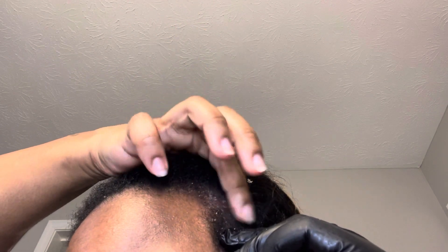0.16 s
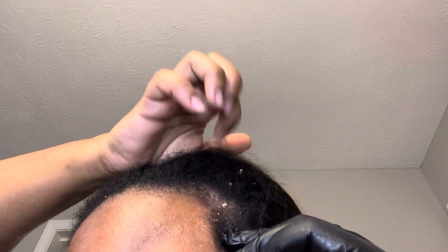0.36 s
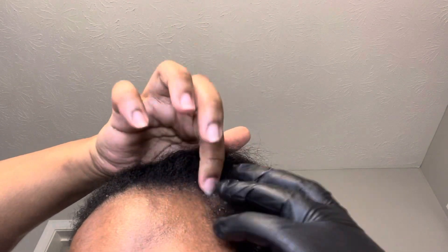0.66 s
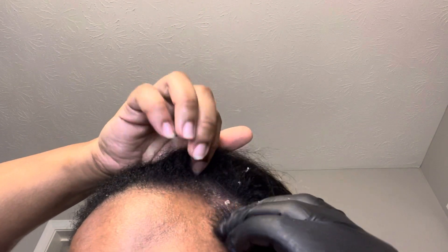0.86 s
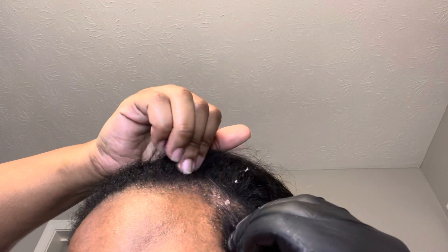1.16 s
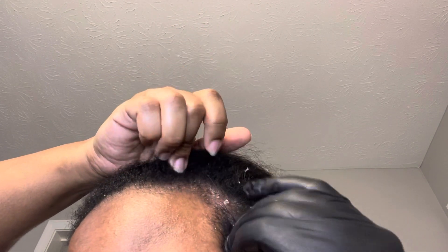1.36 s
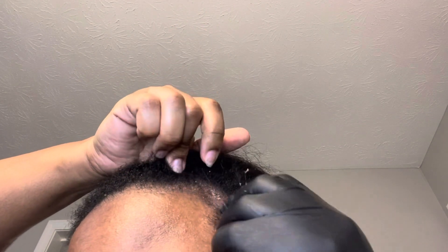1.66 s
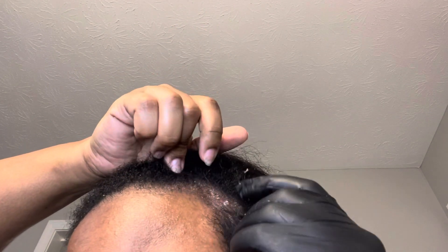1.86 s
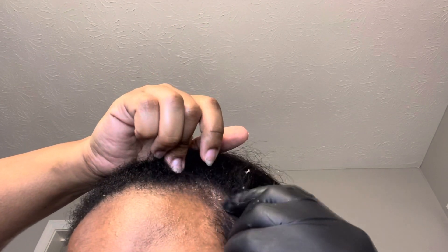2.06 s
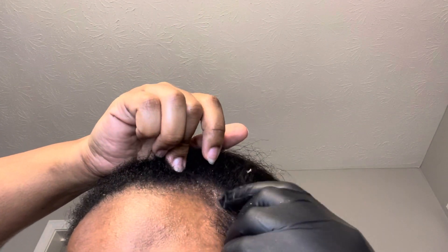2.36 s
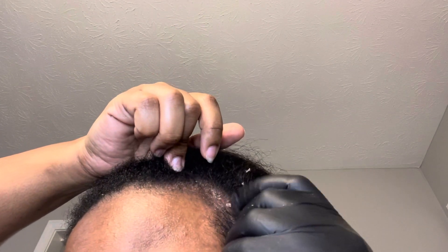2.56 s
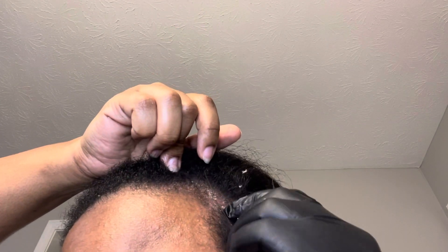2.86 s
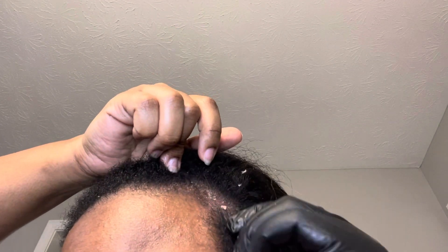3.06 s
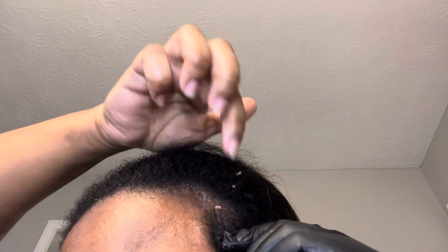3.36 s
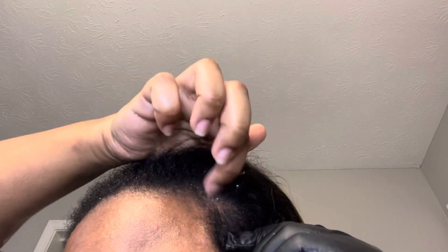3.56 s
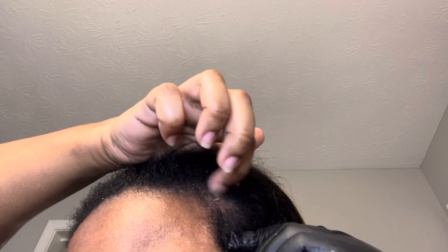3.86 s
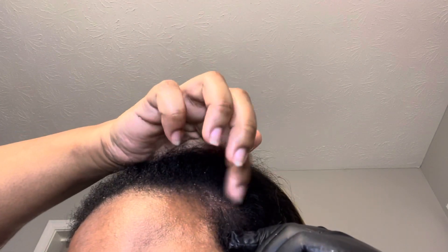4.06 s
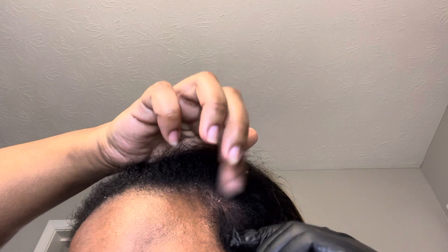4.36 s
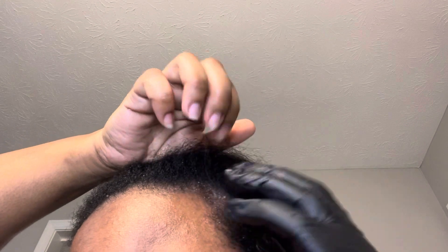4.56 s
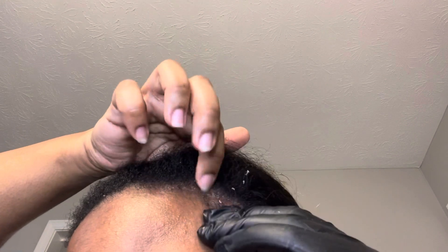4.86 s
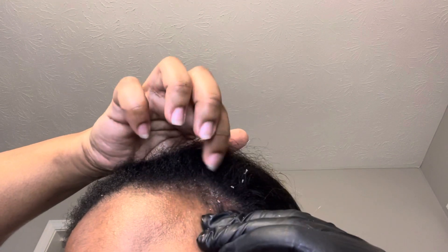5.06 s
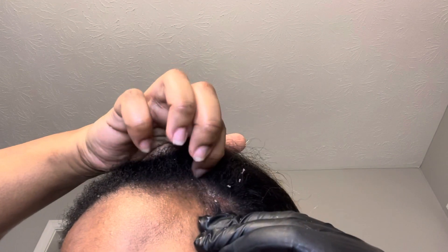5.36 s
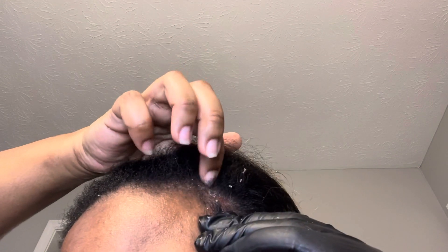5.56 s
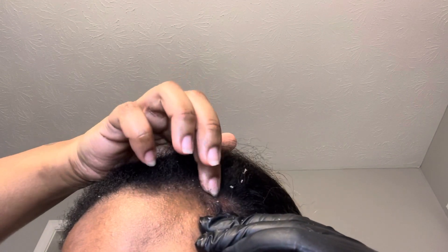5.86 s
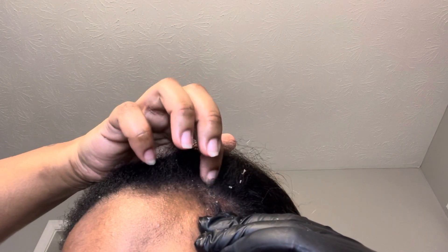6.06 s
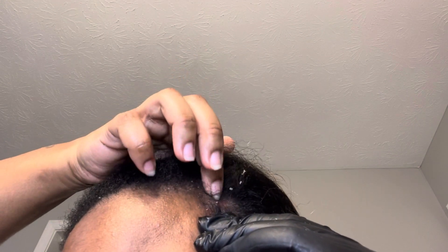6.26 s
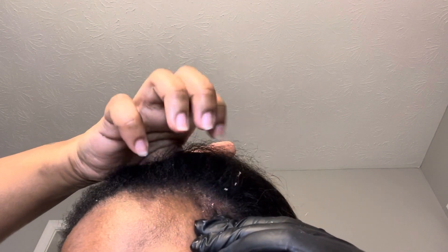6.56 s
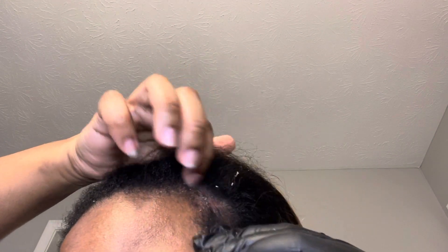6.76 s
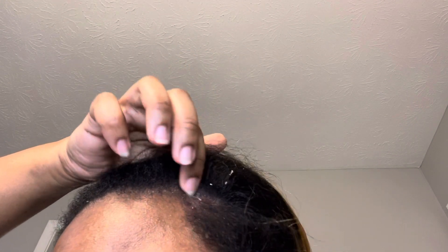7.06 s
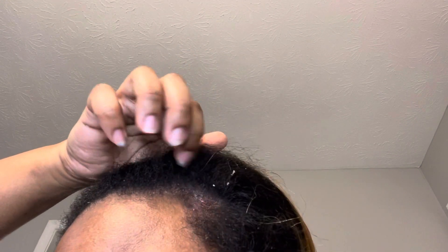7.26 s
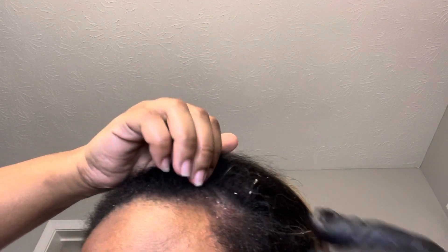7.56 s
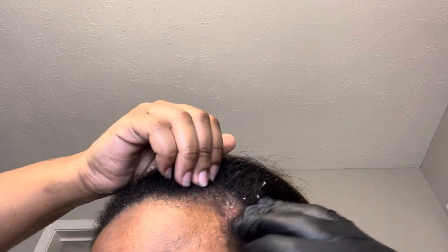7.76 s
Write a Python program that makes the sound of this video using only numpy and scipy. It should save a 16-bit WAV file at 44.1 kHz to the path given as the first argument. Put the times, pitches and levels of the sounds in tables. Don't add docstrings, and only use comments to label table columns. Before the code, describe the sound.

Close, irregular nail scratches and tiny bright snaps in coarse hair, a rubbery glove swishing between them, quiet motor hum in a small room.

```python
import sys
import numpy as np
from scipy import signal
from scipy.fft import rfft, irfft, next_fast_len
from scipy.io import wavfile
from scipy.ndimage import uniform_filter1d

SR = 44100
rng = np.random.default_rng(int(sys.argv[2]) if len(sys.argv) > 2 else 0)


def to_linear_factor(level_db):
    exponent = np.asarray(level_db, float) / 20
    return 10 ** exponent


def output_pcm(signal):
    pcm = np.clip(np.atleast_2d(signal).T, -1, 1) * 32767
    wavfile.write(sys.argv[1], SR, np.round(pcm).astype(np.int16))


N = 348831
LONG = next_fast_len(N, True)
HZ = np.fft.rfftfreq(LONG, 1 / SR)

# freq_hz, density_db
SCRAPE_COLOUR = [(1200, -13), (2200, -2), (3400, -0.5), (4600, -1.5), (6500, -4), (8500, -1.5),
                 (10500, -6.5), (13000, -6.5), (16000, -9)]


def strokes():
    slips_per_s, puff_s = 1800, 0.00073
    strength = to_linear_factor(2.6 * np.minimum(rng.exponential(1, N), 6))
    slips = strength * (rng.random(N) < slips_per_s / SR)
    slips = signal.lfilter([1], [1, -np.exp(-1 / (puff_s * SR))], slips)
    clumps = drift(70.0)
    clumps = to_linear_factor(1.3 * (clumps - uniform_filter1d(clumps, size=3000)))
    rustle = (1.25 + evened(slips)) * clumps * rng.standard_normal((2, N))

    hz, t, z = signal.stft(evened(rustle), SR, nperseg=128, noverlap=96)
    octave = np.log(hz / 5000 + 1e-9) / np.log(11000 / 5000)
    treble = np.clip(octave, -.3, 1.3)[:, None]
    rubber = abs(ring(hz, 4650, 1.63))[:, None] ** 2 - .4
    patches = rng.standard_normal((len(hz), len(t)))
    patches = uniform_filter1d(patches, size=5, axis=0)
    patches = evened(uniform_filter1d(patches, size=14, axis=1))

    pressure_db, bright_db, ring_db = touch(t)
    field_db = read(SCRAPE_COLOUR, hz)[:, None] + pressure_db + treble * bright_db
    field_db += rubber * ring_db + 2.2 * patches
    return to_linear_factor(6.5) * signal.istft(z * to_linear_factor(field_db), SR, nperseg=128, noverlap=96)[1][:, :N]


# peak_s, pressure_db, approach_s, release_s, top_octave_db
SCRATCHES = [(.06, -69.5, .05, 0.16, 12.5), (0.286, -65.5, .05, 0.11, 13.5), (.509, -63, 0.061, 0.3, 4.5),
             (0.711, -57, 0.023, 0.34, 8.5), (1.233, -67, 0.083, 0.25, 4),
             (3.544, -59.5, 0.079, 0.092, 2.5), (3.837, -56, .004, .13, 5),
             (4.131, -54.5, 0.007, 0.11, 6.5), (4.398, -52, 0.029, 0.11, 7), (4.606, -66, .08, 0.26, 3),
             (4.869, -54.5, 0.013, 0.17, 10), (5.19, -68.5, 0.053, .12, 7), (5.268, -60.5, 0.014, 0.14, 11),
             (5.394, -79, 0.03, 0.14, 18), (5.5, -57.5, 0.021, 0.084, 4), (5.729, -82, 0.021, .25, 19.5),
             (5.93, -71.5, 0.073, 0.15, 12.5), (6.106, -84, 0.073, .1, 17), (6.196, -81.5, 0.11, .16, 20),
             (6.387, -61, 0.052, 0.099, 10), (6.723, -55.5, 0.028, 0.23, 7.5),
             (7.068, -60.5, 0.022, 0.095, 7), (7.089, -52.5, .005, 0.14, 9), (7.447, -65.5, 0.097, 0.81, 4)]
# peak_s, pressure_db, swell_s,
# fade_s, rubber_ring_db
RUBS = [(.8, -64.5, 0.049, 0.36, 5), (1.64, -64.5, 0.27, 0.25, 7.5), (1.68, -63.5, 0.084, 0.1, 12),
        (2.07, -67, 0.22, .24, 5), (2.107, -65.5, 0.086, 0.04, 22), (2.4, -69, 0.16, 0.2, 11.5),
        (2.415, -64.5, .05, 0.047, 16), (2.62, -78, .03, 0.031, 23), (2.77, -70, 0.14, .18, 14),
        (2.99, -65, 0.095, 0.31, 9), (3.25, -75, 0.34, .33, 11), (3.81, -73.5, 0.066, 0.031, -8),
        (4.11, -85, 0.083, .03, -2), (4.78, -71.5, 0.56, 0.43, 2), (6.58, -77, 0.089, 0.52, 6),
        (7.84, -62.5, 0.17, 0.28, 6.5)]


def touch(t):
    rest_db, rest_bright_db, rub_bright_db = -94, -6, 4
    lead_db, dull_db = 9, 11
    power = to_linear_factor(rest_db) ** 2 + 0 * t
    bright, rubber = power * rest_bright_db, 0 * t
    for peak_s, db, rise_s, fall_s, bright_db in SCRATCHES:
        p, before, after = gesture(t, peak_s, db, rise_s, fall_s, rise_curve=1, fall_curve=0.77)
        bright_now_db = bright_db + lead_db * np.tanh(before) - dull_db * np.tanh(after)
        power, bright = power + p, bright + p * bright_now_db
    for peak_s, db, rise_s, fall_s, ring_db in RUBS:
        p = gesture(t, peak_s, db, rise_s, fall_s, rise_curve=2.3, fall_curve=2.46)[0]
        power, bright, rubber = power + p, bright + p * rub_bright_db, rubber + p * ring_db
    return 10 * np.log10(power), bright / power, rubber / power


def gesture(t, peak_s, db, rise_s, fall_s, rise_curve, fall_curve):
    before = np.maximum(peak_s - t, 0) / rise_s
    after = np.maximum(t - peak_s, 0) / fall_s
    down_db = np.minimum(25 * (before ** rise_curve + after ** fall_curve), 200)
    return to_linear_factor(db - down_db) ** 2, before, after


# start_s, peak_db, ring_hz,
# skin_knock_db
TWO_CATCHES = [
    (4.6122, -33.5, 5800, -22),
    (7.0846, -25.5, 10500, -17),
]
# start_s, peak_db, ring_hz, skin_knock_db
NAIL_PICKS = [(.2597, -46, 11200, -28), (0.2708, -40, 12500, -29), (0.6798, -44, 10800, -21),
              (0.7017, -35, 9200, -13), (0.7072, -40, 8000, -9), (.7194, -53, 12200, -30),
              (0.725, -38, 9500, -25), (3.5327, -54, 7520, -2), (3.8357, -36.5, 6500, -26),
              (4.1275, -42, 12500, -18), (4.131, -35, 7400, -18.5), (4.1326, -38, 12600, -18),
              (4.3799, -42, 12600, -22), (4.403, -39, 9000, -12), (4.849, -42, 7950, -20),
              (4.8622, -36, 5500, -27), (4.881, -36.5, 12500, -17), (5.1948, -42, 12000, -31),
              (5.2422, -38, 7250, -37), (5.2618, -32.5, 8000, -24), (5.4966, -32, 11000, -12.5),
              (5.9263, -42, 10200, -33), (5.946, -47, 11000, -21), (6.103, -51.5, 12400, -20),
              (6.377, -37, 11100, -16), (6.716, -47, 12500, -26), (7.0229, -40, 10700, -34),
              (7.0648, -49, 11100, -14), (7.4646, -48.5, 3250, -10), (7.473, -43, 11300, -28)]
# start_s, peak_db
HAIR_FLICKS = [(.8514, -50), (.9976, -50), (1.049, -52), (1.656, -42), (1.7294, -61), (2.112, -52),
               (2.3685, -52.5), (4.829, -49), (4.8735, -54), (3.486, -49), (5.0666, -55), (5.1412, -50),
               (5.174, -48), (5.1985, -44), (.7135, -46), (.716, -49), (5.2874, -44.5), (5.3862, -56),
               (5.7274, -60), (5.887, -46), (6.337, -47), (6.71, -50), (6.8295, -48), (7.4375, -50),
               (7.5093, -47), (7.5727, -79)]
# start_s, peak_db
TUGS = [(.1174, -63), (0.492, -55), (.503, -56), (.919, -49), (1.5044, -51), (1.68, -48), (1.778, -51),
        (1.9833, -49.5), (2.043, -47), (2.1126, -48), (2.369, -53), (2.404, -48), (2.406, -53),
        (2.4095, -50), (2.414, -46), (2.4178, -45.5), (2.6226, -51), (2.9665, -47), (3.0021, -55),
        (3.0144, -55), (4.6334, -57), (4.7694, -58), (6.9232, -61)]


def picks():
    out, t = np.zeros((2, N + 4096)), np.arange(4096) / SR
    f = np.fft.rfftfreq(len(t), 1 / SR)
    snap = np.minimum(t / 0.00034, 1) * (to_linear_factor(-60 * t / 0.0023) + 0.13 * to_linear_factor(-60 * t / 0.0064))
    drag = to_linear_factor(-26.5 - 60 * t / 0.074) * np.minimum(t / 0.0018, 1)

    catches = [*TWO_CATCHES, *NAIL_PICKS]
    for small, ring_hz, knock_db in [(HAIR_FLICKS, 11700, -37), (TUGS, 5000, -45)]:
        for start_s, db in small:
            catches.append((start_s, db, ring_hz * (1 + .06 * rng.standard_normal()), knock_db))

    for start_s, db, hz, knock_db in catches:
        grit = to_linear_factor(4.5 * uniform_filter1d(rng.standard_normal(len(t)), size=40) * np.sqrt(40))
        z = rfft((snap + drag * grit) * rng.standard_normal((2, len(t))))
        broad = .4 * ring(f, hz, 0.86) / (1 + (f / hz / 2.9) ** 4)
        knock = to_linear_factor(knock_db + 17.0) * ring(f, 2740, 3.7) ** 2
        sound = irfft(z * (broad + ring(f, hz, 2.9) + knock), len(t))
        at = round(start_s * SR) + 10
        out[:, at:at + len(t)] += to_linear_factor(db + 3) * sound / abs(sound).max(axis=1, keepdims=True)
    return out[:, :N]


# freq_hz, left_minus_right_db
NEAR_BALANCE = [(1500, -10), (3000, -3), (5500, -3), (8000, 4.5), (16000, -3)]


def fingers():
    lean = to_linear_factor(read(NEAR_BALANCE, HZ) / 2 * np.array([[1], [-1]]))
    return irfft(ports(strokes() + picks(), column=2) * lean, LONG)[:, :N]


# freq_hz, room_likeness (0-1), near_likeness (0-1), left_lead_rad
PORTS = [(0, .8, .9, 0), (300, .7, .9, .3), (700, .55, .8, 1.2), (1300, .3, .6, 2.5), (2100, .2, .6, 4.5),
         (4000, .15, .5, 2.2), (5750, .3, .6, 0), (6900, .3, .4, 1.3), (7800, .88, .94, 2.0),
         (17000, .92, .96, 12.75)]


def ports(pair, column):
    table = np.transpose(PORTS)
    same = np.clip(np.interp(HZ, table[0], table[column]), 0, 1)
    lag = np.exp(-1j * np.interp(HZ, table[0], table[-1]))
    a, b = rfft(pair, LONG)
    right = (same * a + np.sqrt(1 - same ** 2) * b) * lag
    return np.array([a, right])


# freq_hz, density_db
AIR_COLOUR = [(20, -13), (40, -11), (85, -6.5), (140, -2), (220, 2.5), (290, -2.6), (400, -6.5), (500, -16),
              (620, -10), (800, -12.5), (1100, -17.5), (1500, -22.5), (2500, -29), (4000, -36.5)]
# freq_hz, density_db
HISS_COLOUR = [(2500, -7), (5000, -6), (8000, -1), (11000, -9), (16000, -12)]
# freq_hz, width_hz, left_db, right_db
DUCT = [(53, 12, 7, 8), (154, 4.3, 14.5, 7.5), (191, 1.6, 11, 3.5), (202, 9.6, 4.5, -5.5), (223, 32, -2, 2),
        (241.6, 21.5, 9.5, 9), (316.7, 26.5, 8, 9), (331, 10.8, -12, 11.5), (369.8, 6.5, -6, 9.5),
        (430.5, 6.3, -8, 15), (447.6, 11.8, 9.5, 8.5), (525.4, 14, -3, 10.5), (636, 60, 9.5, 3.5),
        (652.5, 9.1, 6, 12), (665.4, 90, -4, 6), (757, 5, -5.5, 4), (791, 3.8, 3, -15), (882, 18, 9, -4),
        (1025, 1.9, -1, 0.5), (1268, 5.9, 10, 10.5)]


def ventilation():
    colour = np.ones((2, len(HZ)))
    for hz, width_hz, *db in DUCT:
        colour += to_linear_factor(np.array(db))[:, None] ** 2 / (1 + (2 * (HZ - hz) / width_hz) ** 4)
    air_db = -32.5 + read([*AIR_COLOUR, (9000, -62.5)], HZ) + np.array([[-.7], [.7]])
    air = to_linear_factor(air_db) * np.sqrt(colour)
    hiss = to_linear_factor(-75 + read(HISS_COLOUR, HZ))
    noise = ports(rng.standard_normal((2, N)), column=1)
    return irfft(noise * np.hypot(air, hiss), LONG)[:, :N]


# pitch_hz, left_db, right_db, waver_hz, waver_db
MOTOR = [
    (59.83, -63, -57.5, 0.33, 0.5),
    (122.8, -56, -61, 0.64, 2),
    (248.9, -51.5, -46.5, 1.0, 1.12),
]


def motor():
    port_lag_s = 0.00075 * np.array([[0], [1]])
    out = np.zeros((2, N))
    for hz, left_db, right_db, waver_hz, waver_db in MOTOR:
        cycles = np.cumsum(hz + waver_hz * drift(2.38)) / SR - hz * port_lag_s
        tone = np.sin(2 * np.pi * cycles) * to_linear_factor(waver_db * drift(9.1))
        out += np.sqrt(2) * to_linear_factor(np.array([[left_db], [right_db]])) * tone
    return out


def ring(f, hz, sharp):
    damping = 1j * f / hz / sharp
    return damping / (1 - (f / hz) ** 2 + damping)


def drift(hz):
    steps = N // 64 + 2
    lowpass = 1 + (np.fft.rfftfreq(steps, 64 / SR) / hz) ** 2
    slow = irfft(rfft(rng.standard_normal(steps)) / lowpass, steps)
    return np.interp(np.arange(N) / 64, np.arange(steps), evened(slow))


def evened(x):
    return x / np.sqrt(np.mean(x ** 2) + 1e-20)


def read(points, hz):
    f, value = np.transpose(points)
    return np.interp(np.log(hz + 1), np.log(f + 1), value)


def scene():
    return fingers() + ventilation() + motor()


def top_cut(x):
    return signal.sosfilt(signal.butter(12, 17270, fs=SR, output="sos"), x)


def record(dry):
    return top_cut(dry)


dry = scene()
out = record(dry)
output_pcm(out)
```